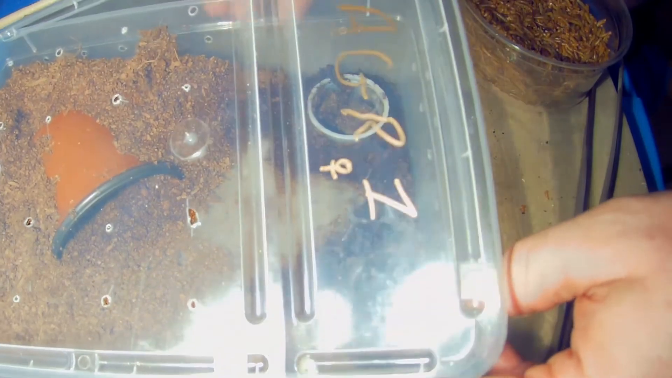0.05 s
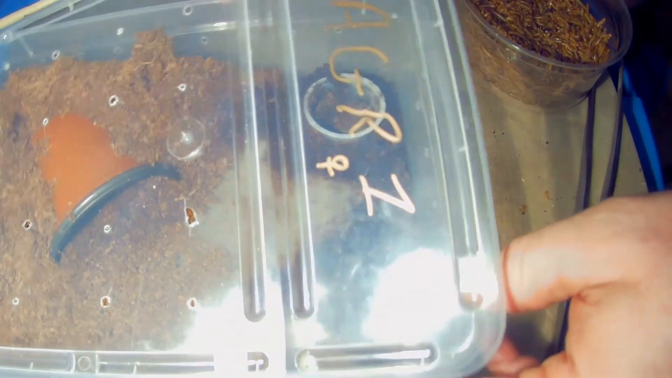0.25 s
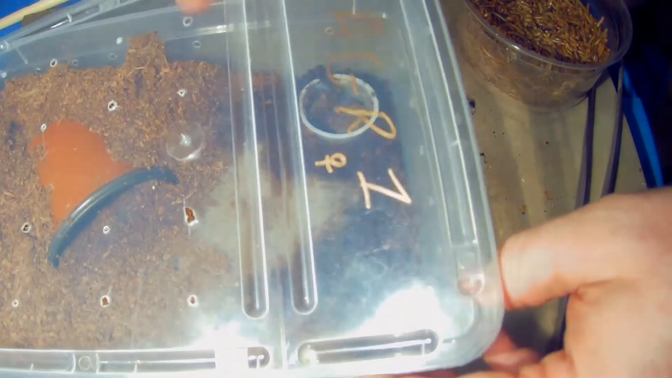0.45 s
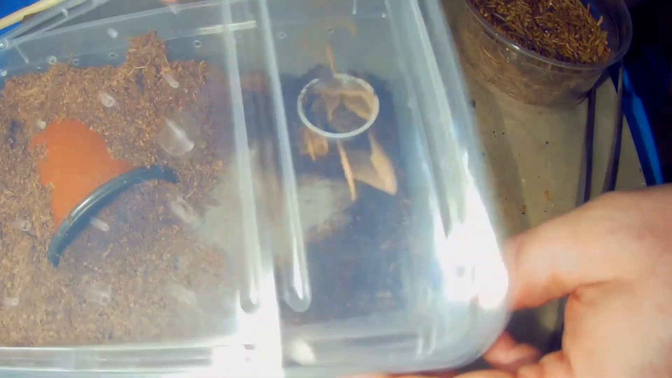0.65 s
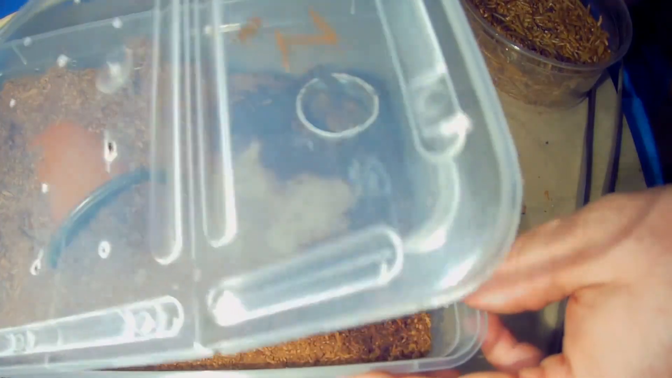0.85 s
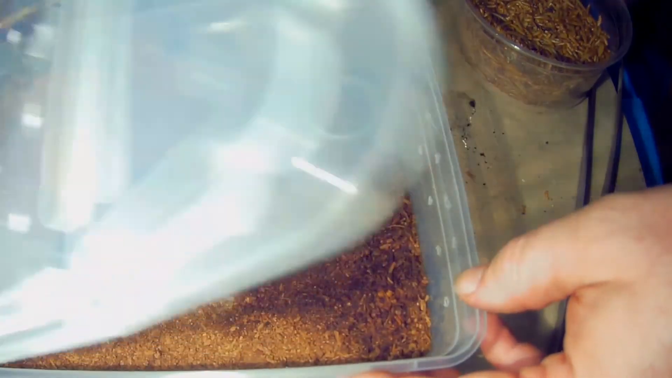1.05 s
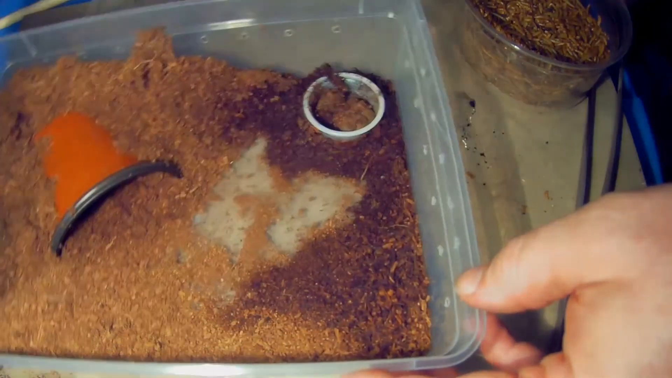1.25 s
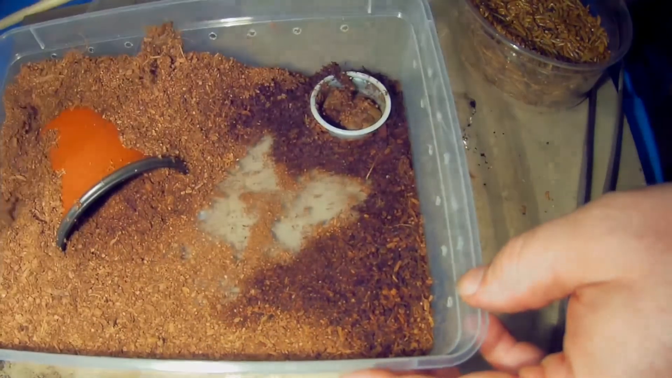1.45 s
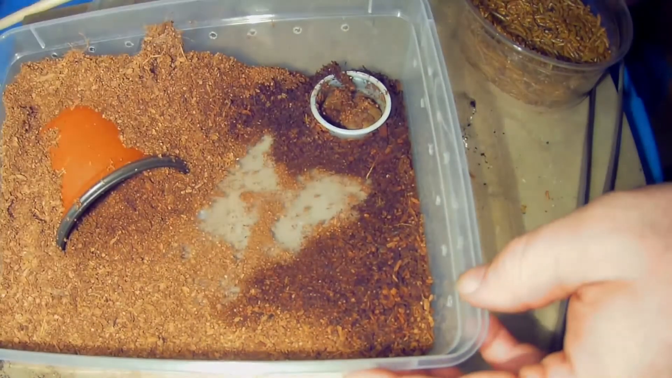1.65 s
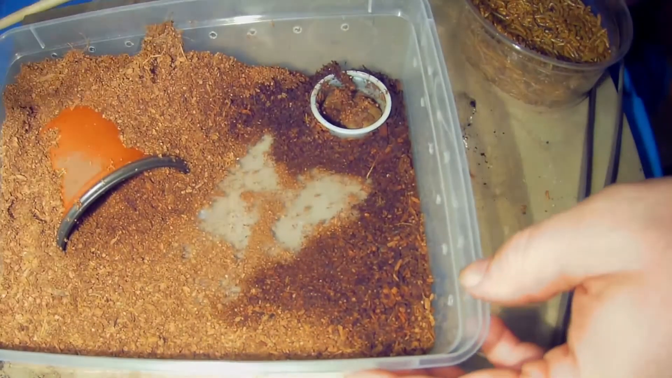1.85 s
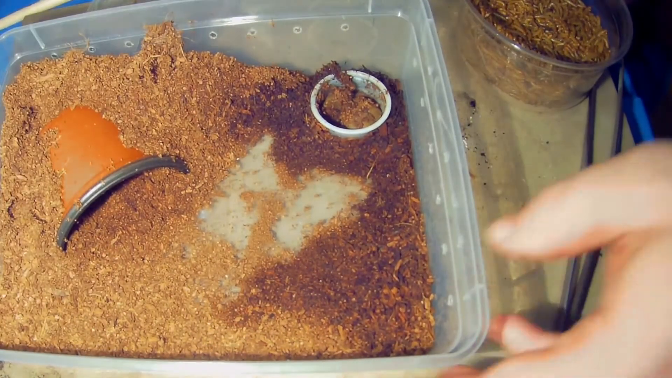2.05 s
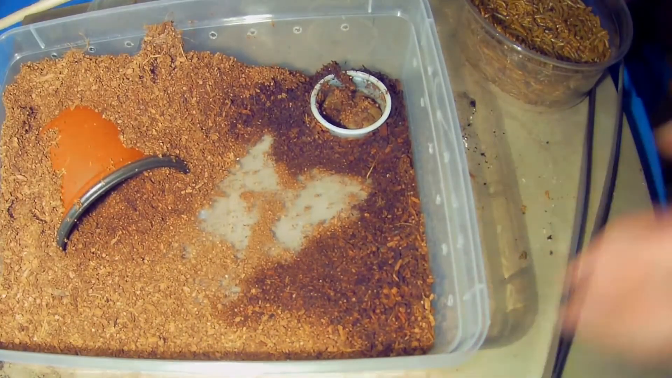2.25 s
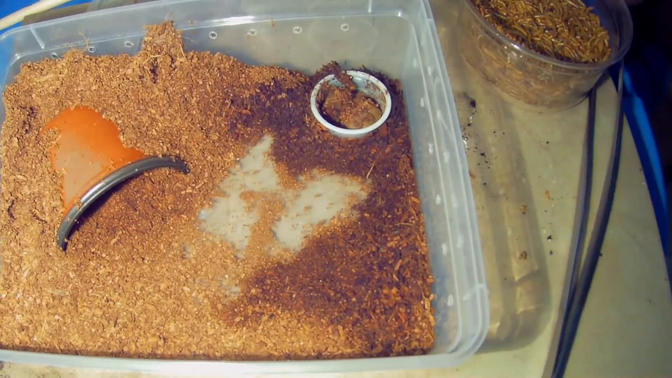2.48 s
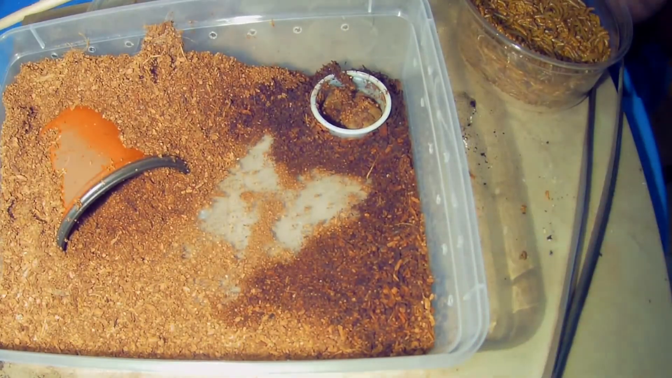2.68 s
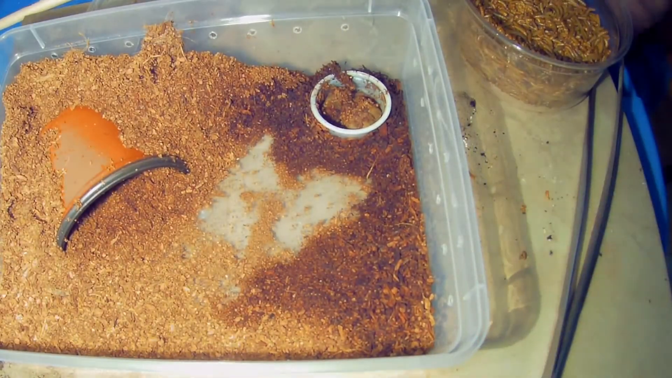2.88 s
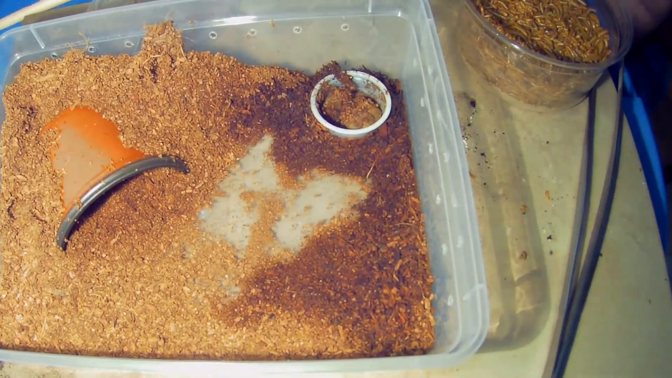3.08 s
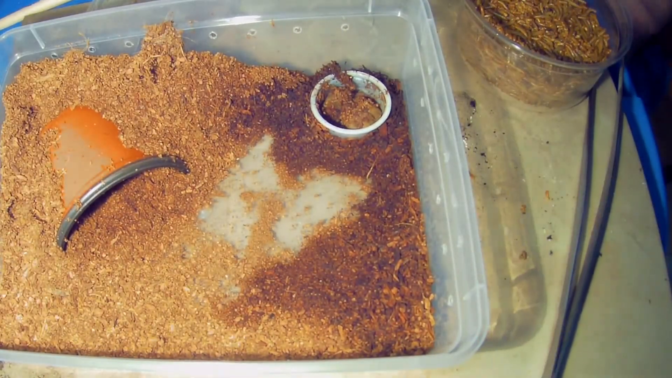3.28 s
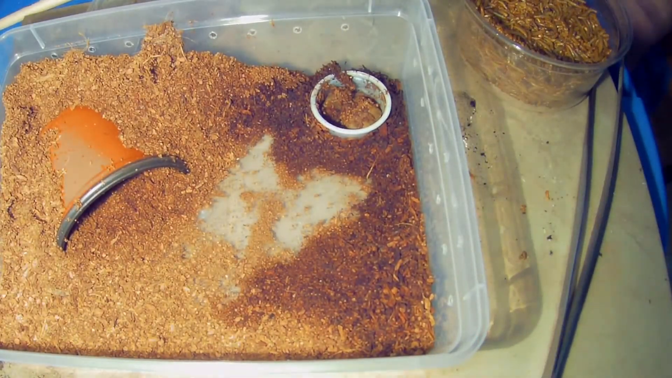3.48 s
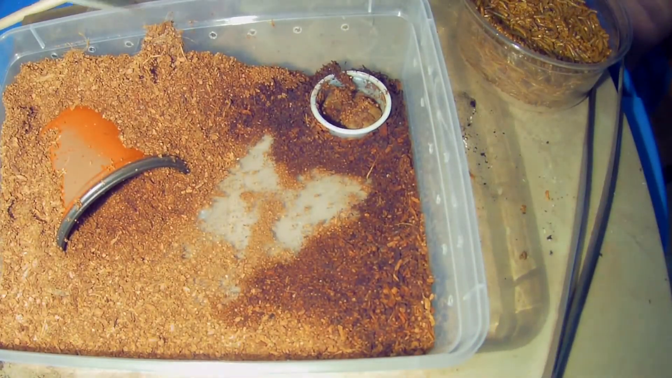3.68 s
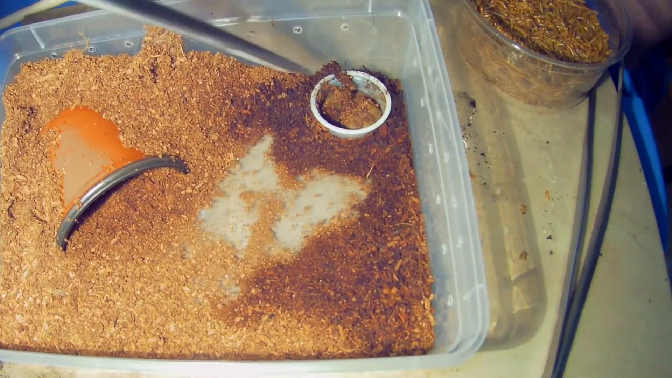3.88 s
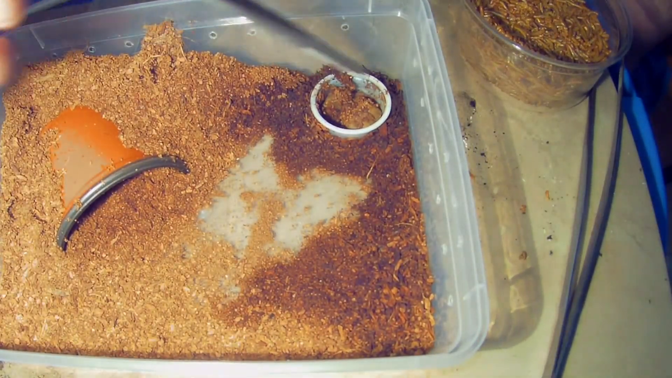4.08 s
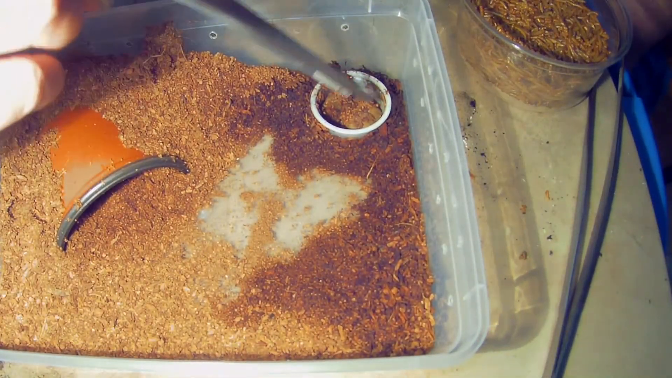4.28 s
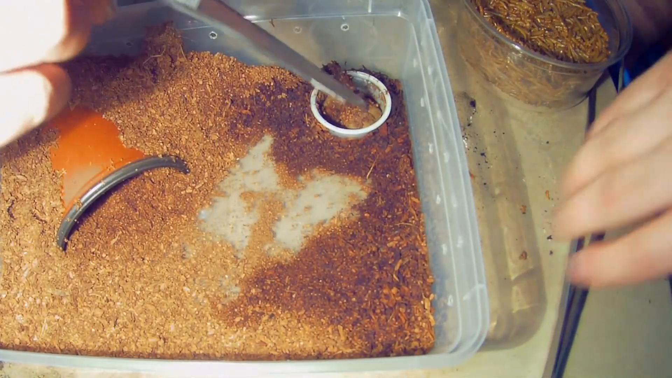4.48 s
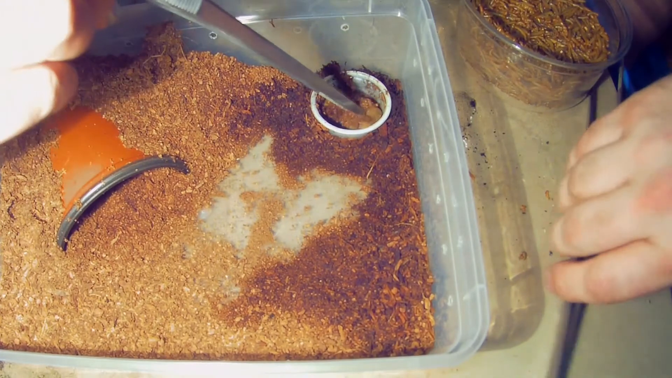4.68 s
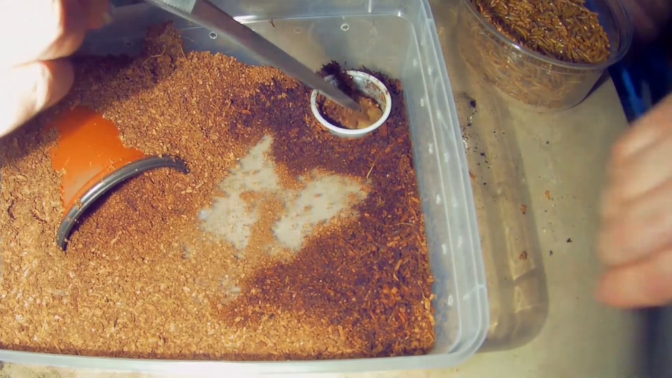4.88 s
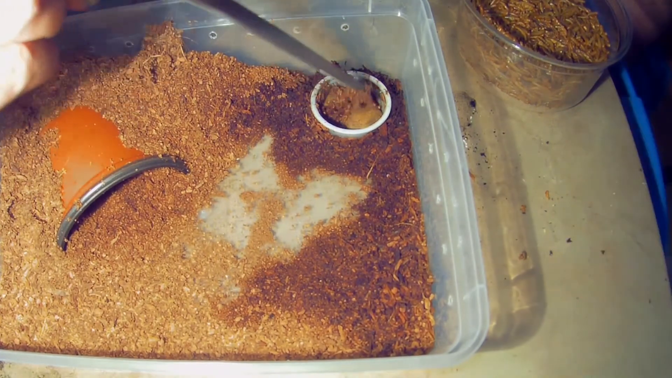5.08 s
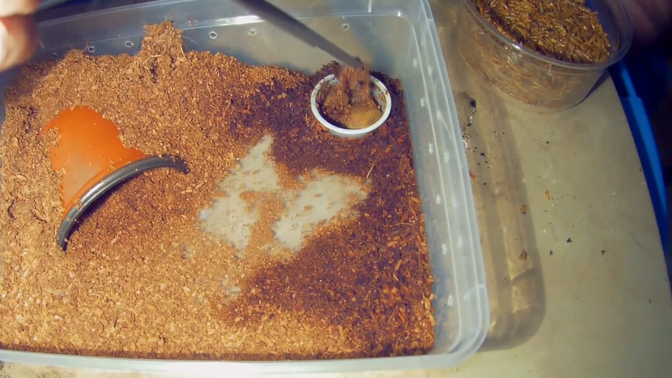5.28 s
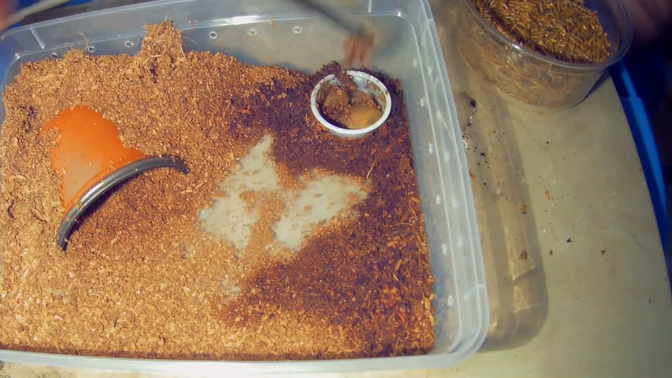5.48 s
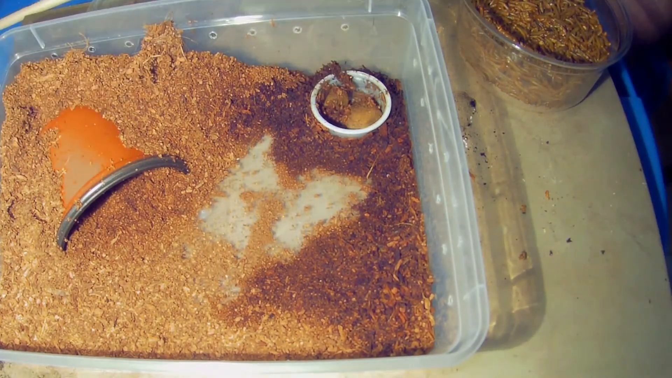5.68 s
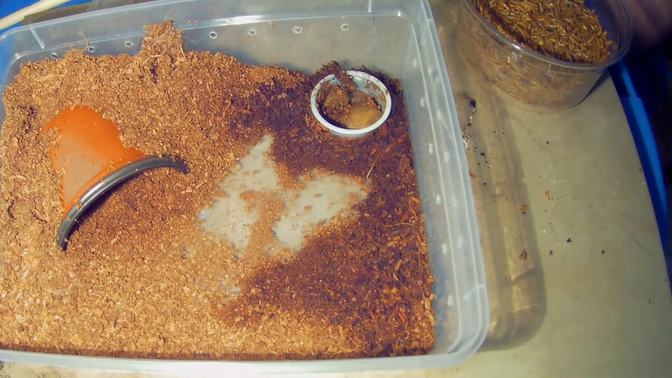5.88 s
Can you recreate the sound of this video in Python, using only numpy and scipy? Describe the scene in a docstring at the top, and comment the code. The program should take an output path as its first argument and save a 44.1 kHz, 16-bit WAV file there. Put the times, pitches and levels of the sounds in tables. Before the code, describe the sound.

Very near the microphone, a thin plastic lid clicks, pops free of its hollow tub and snaps loudly, with a brief rattle. After a quiet gap, metal tongs clatter twice further off, with more room in the sound. Faint steel clinks, small ticks and a short plastic drag follow. A small indoor room, faint hum and soft hiss underneath.

```python
"""The lid of a plastic tub is unclipped, lifted off and knocked about close to the microphone: edges snap, the panel rings.
Further off, long tongs are picked up with two clatters: dull knocks and ringing metal, with much of the room.
They scratch in the tub as fine slips, and something plastic is dragged briefly over the table, ringing its body.
A small quiet room adds reflections; a faint hum, a thin whine and shaped noise lie under it all."""
import sys
import numpy as np
from scipy import signal
from scipy.fft import rfft, irfft
from scipy.io import wavfile
from scipy.ndimage import uniform_filter1d

SR = 44100
rng = np.random.default_rng(int(sys.argv[2]) if len(sys.argv) > 2 else 0)


def inscribe(sig):
    """Save sig as 16-bit PCM at rate SR to the path in sys.argv[1].

    A 1-D sig is mono; a 2-D sig holds one channel per row.
    Samples are clipped to [-1, 1] before scaling.
    """
    pcm = np.round(np.clip(np.atleast_2d(sig).T, -1, 1) * 32767)
    wavfile.write(sys.argv[1], SR, pcm.astype(np.int16))


N = 262130  # length of the scene [samples]

# the lid snaps and knocks: (time [s], edge snap level [dB], panel flex level [dB])
LID_EVENTS = [(0.2635, -38.5, -30.5), (0.5651, -42, -43), (0.6650, -27, -20), (0.6690, -27, -22),
              (0.6835, -20, -24), (0.7205, -35, -19), (1.2123, -23, -38), (1.2352, -13.5, -6.5),
              (1.2430, -4.5, -18), (1.2509, -9, -21), (1.3962, -16, -11), (1.4023, 0.5, 7),
              (1.4050, 0, -8.5), (1.4898, -13, -20), (1.5060, -28, -24), (1.7183, -39, -31.5)]
# the thin lid panel rings: (frequency [Hz], level [dB], time to fall 60 dB [s])
PANEL_MODES = [(572, 4.5, 0.015), (753, -12.5, .03), (971, -4, 0.016), (1229, -10.5, 0.028),
               (1333, -16.5, 0.018), (1885, -16.5, 0.021), (2262, -7, 0.014), (2716, -28, 0.0116)]
# the whole lid flaps: (frequency [Hz], level [dB], time to fall 60 dB [s])
THUMP_MODES = [(130.05, -18, 0.19), (224.4, 0.5, 0.036), (274, -19, 0.13)]
# colour of a plastic edge letting go, also used for the tongs' bright contacts and the rubs:
# (frequency [Hz], level [dB])
SNAP_COLOUR = [(60, -44), (400, -24), (1500, -10.5), (2300, -9), (3200, -18), (4200, -9.5), (5500, -9),
               (6800, -1.5), (8000, -2.5), (9000, 1), (10000, -3), (11200, -11.5), (13000, -10),
               (16000, -20)]
# the hollow tub is knocked as the lid leaves its rim: (time [s], level [dB])
TUB_EVENTS = [(0.6660, -10.5), (0.6860, -11.5), (0.7020, -15)]
# the hollow tub rings: (frequency [Hz], level [dB], time to fall 60 dB [s])
TUB_MODES = [(79.5, -6, 0.18), (142, -7.5, 0.075), (202, -13, 0.051), (296, -6, 0.091), (563, -1.5, 0.061),
             (597, 2, 0.058), (634, -0.5, 0.12), (726, 1.5, 0.097), (785, -3, 0.072), (1157, -9, .06)]
# the tongs touch down: (time [s], tick level [dB], knock level [dB], table thud level [dB], ring pitch [factor])
TONGS_EVENTS = [(3.0480, -45, -51, -48, 0.92), (3.5603, -20, -22.5, -14.5, 1.04),
                (3.5798, -21, -17.5, -24, 0.68), (3.7760, -19.5, -22, -30, 1.28),
                (3.7884, -33, -20.5, -38, 0.93), (3.7985, -17.5, -17.5, -22.5, 1.0),
                (3.8955, -37.5, -37, -37, 0.89), (4.4279, -41, -54, -56, 1.0),
                (4.5621, -37.5, -58, -58, 0.67), (4.8285, -30, -44, -45, 1.0)]
# the tongs ring: (frequency [Hz], level [dB], time to fall 60 dB [s])
TONGS_MODES = [(221, -9.5, 0.186), (510, -30, 0.165), (741.5, 5, 0.16), (1022, -1.5, 0.16),
               (1332, -0.5, 0.13), (1771, -31, 0.083), (1860, 1.5, 0.1), (2276, 2.5, 0.13),
               (2810, -3, 0.066)]
# colour of the short dull knock as the tongs touch: (frequency [Hz], level [dB])
KNOCK_COLOUR = [(50, -47), (200, -7), (350, 8.5), (500, 3), (900, 3.5), (1500, 5.5), (2400, 1), (3200, -4),
                (5000, -5), (9000, -13)]
# the table top rings: (frequency [Hz], level [dB], time to fall 60 dB [s])
TABLE_MODES = [(130, -2, 0.4), (185, -5, 0.38), (216, -7, 0.37), (439, 3, 0.13), (493, 1, 0.24)]
# the steel tips of the tongs meet: (time [s], level [dB])
CLINK_EVENTS = [(4.1348, -31.5), (4.147, -29)]
# the steel tips ring: (frequency [Hz], level [dB], time to fall 60 dB [s])
TIP_MODES = [(8440, 1, .07), (8700, 0, 0.087), (9160, -1, 0.045), (11600, -8, .17), (12900, -8, .03)]
# small hard ticks: (time [s], level [dB], ring pitch [factor])
TICK_EVENTS = [(1.2123, -23, 1.18), (1.2352, -14.5, 1.24), (3.0480, -33, 0.215), (4.6510, -24, 0.86),
               (4.6558, -13, 0.93), (4.6663, -17, 0.96), (4.6738, -15.5, 1.0)]
# the bright ring of the ticks: (frequency [Hz], width [Hz], level [dB])
TICK_RESONANCES = [(7210, 920, -17.5), (9530, 220, 4), (9950, 210, 1), (11200, 550, -3), (12100, 490, -27)]
# plastic and fingers rub: (start [s], length [s], level [dB], resonance [Hz])
RUB_EVENTS = [(0.383, 0.05, -61, 7350), (0.44, 0.05, -62.5, 7150), (0.667, 0.018, -32, 7900),
              (0.671, 0.02, -32.5, 6650), (1.142, 0.09, -53.5, 6700), (1.198, 0.022, -44.5, 6560),
              (1.337, 0.03, -56, 8500), (1.562, 0.09, -57, 9600), (2.945, 0.037, -65, 8000),
              (3.273, 0.08, -68, 8720), (3.44, 0.16, -67, 9400), (4.118, 0.04, -62, 8450),
              (4.65, 0.06, -51, 7800), (4.75, 0.07, -56, 6200)]
# something plastic is pushed over the table: (start [s], length [s], level [dB])
PUSH_EVENTS = [(4.655, 0.055, -58), (4.7125, 0.024, -40.3), (4.758, 0.029, -42.5), (4.8, 0.009, -43.5)]
# the dragged thing rings: (frequency [Hz], width before the hand damps it [Hz], level [dB])
DRAG_MODES = [(204, 60, -19), (333, 99, -15), (473, 52, -11.5), (560, 43, -3.5), (720, 60, -10),
              (953, 45, -8.5), (1250, 20.5, -4.5), (1456, 22, -1), (1790, 28, -9.5), (2200, 30, -32),
              (2350, 26, -13), (2800, 19, -22)]
# fine grit under the dragged thing: (frequency [Hz], width [Hz], level [dB])
GRIT_RESONANCES = [(4320, 500, 0), (7010, 1200, -3), (8890, 1200, -3)]
# colour of the background noise: (frequency [Hz], relative level [dB])
HISS_COLOUR = [(12, -40), (20, -8.5), (37, -5.5), (60, -4), (107, -3), (158, -12.5), (210, -10),
               (248, -12.5), (293, -11), (328, -14), (759, -16), (897, -17), (2260, -24.5), (13900, -28),
               (16000, -29)]
# hum and a thin electric whine: (frequency [Hz], level at the start [dB], level at the end [dB])
HUM_LINES = [(65.8, -68.5, -80), (106, -74.5, -77), (140, -68, -78), (292, -72.5, -92.5),
             (6858, -84.5, -86)]
# how fast the room dies away: (frequency [Hz], time to fall 60 dB [s])
ROOM_DECAY = [(120, 0.52), (400, 0.47), (1000, 0.37), (2800, 0.41), (7500, 0.35), (15000, 0.45)]
# colour of the room's reflections: (frequency [Hz], level [dB])
ROOM_TONE = [(100, -1), (220, 0), (360, 1), (500, -4.5), (1200, 4), (2200, 0.5), (3200, 4), (7000, -0.5),
             (9200, -2), (15000, 1)]

# lid: decay of a snap at full force (0 dB) [s], level of the whole lid's thump beside the panel [dB]
SNAP_DECAY_S, THUMP_DB = 0.0007, -5
# the panel rings lower the harder it is flexed: share of its pitch lost at 0 dB
PANEL_SAG = 0.008
# shares sent to the room [dB]: the edge faces the microphone, the panel radiates all round
SNAP_ROOM_DB, FLEX_ROOM_DB = -11, -9
# lighter clicks are duller and slower: treble tilt [dB per octave] and added decay [s] per dB below full force
DULLING_PER_DB, SLOWING_S_PER_DB = 0.18, 0.00005
# the lid rattles on after its loudest clack: start [s], length [s], contacts a second on average
RATTLE_S, RATTLE_LENGTH_S, RATTLE_PER_S = 1.424, 0.03, 300
# middle levels of snap and flex at the rattle's start [dB], and how fast they weaken [dB per s]
RATTLE_SNAP_DB, RATTLE_FLEX_DB, RATTLE_FADE_DB_PER_S = -16.5, -17, 110
# tongs: ring boost, share of each contact sent to the room [dB]
RING_DB, TONGS_ROOM_DB = 2, 1
# the second arm of the tongs lands just after the first: delay [s], level [dB]
SECOND_ARM_S, SECOND_ARM_DB = 0.0034, -5
# ticks: decay [s], share sent to the room [dB]
TICK_DECAY_S, TICK_ROOM_DB = 0.0035, -13
# rubs: share of the time spent swelling, broad hiss against the resonance [dB]
RUB_SWELL, RUB_BROAD_DB = 0.42, -3.5
# every push grips, holds and dies away [s]
PUSH_ATTACK_S, PUSH_RELEASE_S = 0.006, 0.009
HISS_DB = -64.59  # rms of the background noise
EDGE_HZ = 16400  # upper limit of the finished sound


def lid(tilt_from_hz=1500, lowest_hz=95):
    """Each click snaps an edge, flexes the panel and shakes the whole lid; rows: direct sound, sent to the room."""
    snaps, flexes = np.zeros((2, N))
    thump = amp(THUMP_DB) * ring(THUMP_MODES)
    for s, snap_db, flex_db in list(LID_EVENTS) + rattle():
        tilt_db = DULLING_PER_DB * snap_db
        edge = colour([(hz, db + tilt_db * np.log2(max(hz / tilt_from_hz, 1))) for hz, db in SNAP_COLOUR])
        decay = SNAP_DECAY_S - SLOWING_S_PER_DB * snap_db
        add(snaps, s, amp(snap_db) * crack(edge, decay))
        panel = ring(PANEL_MODES, 1 - PANEL_SAG * amp(flex_db))
        add(flexes, s, amp(flex_db) * (panel + thump))
    sent = amp(SNAP_ROOM_DB) * snaps + amp(FLEX_ROOM_DB) * flexes
    out = np.array([snaps + flexes, sent])
    # air slips round a small open panel, so it gives off little deep bass
    return signal.sosfilt(signal.butter(2, lowest_hz, "high", fs=SR, output="sos"), out)


def rattle():
    """Loose, unevenly spaced contacts that weaken: rows (time [s], snap [dB], flex [dB])."""
    chance = rng.uniform(-1, 1, (40, 3))
    after = (np.arange(len(chance)) + chance[:, 0] / 2) / RATTLE_PER_S
    contacts = []
    for t, (_, a, b) in zip(after, chance):
        if t < RATTLE_LENGTH_S:
            fade_db = RATTLE_FADE_DB_PER_S * t
            # each level strays by up to 3 dB
            contacts.append((RATTLE_S + t, RATTLE_SNAP_DB - fade_db + 3 * a, RATTLE_FLEX_DB - fade_db + 3 * b))
    return contacts


def tub(room_db=-11):
    """The rim drags out of the lid and shakes the hollow tub, which rings at its own pitches."""
    out, body = np.zeros(N), ring(TUB_MODES, rise=0.0044)
    for s, db in TUB_EVENTS:
        add(out, s, amp(db) * body)
    return np.array([out, amp(room_db) * out])


def tongs(dull_db=-4, ring_room_db=-12):
    """Each arm lands with a bright tick and a dull knock, heard much through the room; table and tongs ring briefly."""
    contacts, rings = np.zeros((2, N))
    edge, dull = colour(SNAP_COLOUR), colour(KNOCK_COLOUR)
    table = ring(TABLE_MODES, rise=0.0071)
    for s, tick_db, knock_db, thud_db, pitch in TONGS_EVENTS:
        for delay, arm_db in (0, 0), (SECOND_ARM_S, SECOND_ARM_DB):
            tick = amp(tick_db) * crack(edge, decay=0.001)
            knock = amp(knock_db + dull_db) * crack(dull, decay=0.0039)
            add(contacts, s + delay, amp(arm_db) * (tick + knock))
        metal = amp(knock_db + RING_DB) * ring(TONGS_MODES, pitch, rise=0.0015)
        add(rings, s, amp(thud_db) * table + metal)
    sent = amp(TONGS_ROOM_DB) * contacts + amp(ring_room_db) * rings
    return np.array([contacts + rings, sent])


def clinks():
    """Thin steel tips touch and ring, very high and faint."""
    out, tips = np.zeros(N), ring(TIP_MODES, rise=0.00046)
    for s, db in CLINK_EVENTS:
        add(out, s, amp(db) * tips)
    return out


def ticks():
    """Small hard contacts, each a short burst heard through a few resonances."""
    out = np.zeros(N)
    for s, db, pitch in TICK_EVENTS:
        peaks = [(hz * pitch, width * pitch, height) for hz, width, height in TICK_RESONANCES]
        add(out, s, amp(db) * crack(resonances(peaks), TICK_DECAY_S))
    return np.array([out, amp(TICK_ROOM_DB) * out])


def rubs(width_hz=580, room_db=-8):
    """Dense fine slips swell and fade, partly broad, partly in one resonance."""
    out, edge = np.zeros(N), unit(colour(SNAP_COLOUR))
    for s, length, db, hz in RUB_EVENTS:
        u = np.linspace(0, 1, round(length * SR))
        swell = np.interp(u, [0, RUB_SWELL, 1], [0, 1, 0])
        drive = amp(db) * slips(len(u), per_s=2500) * swell
        add(out, s, signal.fftconvolve(drive, resonances([(hz, width_hz, 0)])) / 2)
        add(out, s, signal.fftconvolve(drive, edge) * amp(RUB_BROAD_DB) / 2)
    return np.array([out, amp(room_db) * out])


def drag(direct_db=-2, room_db=-14, soft_hz=2400, grit_db=-15.5, damping_hz=4):
    """Short pushes of soft stick-slip shake a hollow plastic body, damped by the hand, and grind a little grit."""
    t, out = np.arange(SR // 4) / SR, np.zeros(N)
    for s, length, db in PUSH_EVENTS:
        force = np.minimum(t / PUSH_ATTACK_S, 1) * np.exp(-np.maximum(t - length, 0) / PUSH_RELEASE_S)
        drive = amp(db) * force * slips(len(t), per_s=1100)
        soft = signal.sosfilt(signal.butter(4, soft_hz, fs=SR, output="sos"), drive)
        body = 0
        for hz, width, mode_db in DRAG_MODES:
            mode = signal.fftconvolve(soft, resonances([(hz, width + damping_hz, 0)]))
            body = body + amp(mode_db) * unit(mode)
        # the body keeps the energy of the push
        add(out, s, np.linalg.norm(drive) * unit(body))
        add(out, s, amp(grit_db) * signal.fftconvolve(drive, resonances(GRIT_RESONANCES)))
    return np.array([amp(direct_db) * out, amp(room_db) * out])


def room(x, gap=0.0012, build=.006, early_db=6, early_s=0.04):
    """Dense reflections from the table and near walls, then a short tail that dies band by band."""
    hz, t, z = signal.stft(rng.standard_normal(SR * 3 // 4), SR, nperseg=256)
    fall_db = -60 * t / read(ROOM_DECAY, hz)[:, None]
    tone_db = read(ROOM_TONE, hz)[:, None]
    tail = signal.istft(z * amp(fall_db + tone_db), SR, nperseg=256)[1]
    t = np.arange(len(tail)) / SR
    # silence first, then a quick build-up with stronger early reflections
    tail *= np.clip((t - gap) / build, 0, 1) * amp(early_db * np.exp(-(t / early_s) ** 2))
    return signal.fftconvolve(x, unit(tail))[:N]


def background(waver=0.89, waver_hz=9):
    """Steady hiss and rumble from shaped noise, with hum lines whose strength and phase waver slowly."""
    hz, t = np.fft.rfftfreq(N, 1 / SR), np.arange(N) / SR
    noise = irfft(rfft(rng.standard_normal(N)) * amp(read(HISS_COLOUR, hz)), N)
    out = amp(HISS_DB) * evened(noise)
    slow = 1 / (1 + (hz / waver_hz) ** 2)
    for line_hz, first_db, last_db in HUM_LINES:
        a, b = (evened(irfft(rfft(rng.standard_normal(N)) * slow, N)) for _ in range(2))
        tone = ((1 + waver * (a + 1j * b)) * np.exp(2j * np.pi * line_hz * t)).real
        out += amp(np.linspace(first_db, last_db, N)) * evened(tone)
    return out


def ring(modes, pitch=1, rise=.0012):
    """Struck modes swell as the blow spreads, then die away; energy 1."""
    t = np.arange(SR // 2) / SR
    tones = sum(amp(db - 60 * t / t60) * np.sin(2 * np.pi * hz * pitch * t) for hz, db, t60 in modes)
    return unit(tones * (1 - np.exp(-t / rise)))


def resonances(peaks):
    """The answer to one sharp tap of resonances with (centre [Hz], width [Hz], height [dB]); energy 1."""
    t = np.arange(SR // 4) / SR
    tones = 0
    for hz, width, db in peaks:
        tones = tones + amp(db) * width * np.exp(-np.pi * width * t) * np.cos(2 * np.pi * hz * t)
    return unit(tones * np.heaviside(t, .5))


def crack(response, decay, size=2048):
    """A contact: a quickly dying burst of tiny slips, evened across bands, heard through a response; energy 1."""
    fade = np.exp(-np.arange(size) / SR / max(decay, 1e-4))
    burst = np.fft.fft(rng.standard_normal(size) * fade)
    bands = np.sqrt(abs(uniform_filter1d(abs(burst) ** 2, size=32, mode="wrap")))
    return unit(signal.fftconvolve(np.fft.ifft(burst / causal(bands)).real, response))


def slips(size, per_s):
    """Irregular stick-slip impulses, rms 1."""
    chance, strength = rng.random(size), rng.standard_normal(size)
    return evened((chance < per_s / SR) * (np.sign(strength) + strength))


def colour(points, size=4096):
    """A short filter with this spectrum that never sounds ahead of its input."""
    gain = amp(read(points, abs(np.fft.fftfreq(size, 1 / SR))))
    return np.fft.ifft(causal(gain)).real[:size // 2]


def causal(gain):
    """The minimum-phase spectrum that has this gain (given over the full frequency circle)."""
    return np.exp(np.conj(signal.hilbert(np.log(gain + 1e-9))))


def read(points, hz):
    """Reads a table at any frequency, joined on a log-frequency axis."""
    f, value = np.transpose(points)
    return np.interp(np.log(hz + 1), np.log(f + 1), value)


def amp(db):
    """Decibels to gain."""
    return 10 ** (np.asarray(db) / 20)


def unit(x):
    """Scales to energy 1."""
    return x / np.sqrt(np.sum(x ** 2) + 1e-20)


def evened(x):
    """Scales to rms 1."""
    return unit(x) * np.sqrt(len(x))


def add(mix, s, sound):
    """Lays a sound into the mix at time s [s]."""
    part = mix[round(s * SR):][:len(sound)]
    part += sound[:len(part)]


def scene():
    """All sources, their reflections and the background."""
    direct, sent = lid() + tub() + tongs() + ticks() + rubs() + drag()
    return (direct + clinks() + room(sent) + background())[None]


def record(dry):
    """Removes what lies above the upper limit."""
    low_pass = signal.firwin(301, EDGE_HZ, window=("kaiser", 8), fs=SR)
    return signal.oaconvolve(dry, low_pass[None], "same")


dry = scene()
out = record(dry)
inscribe(out)
```